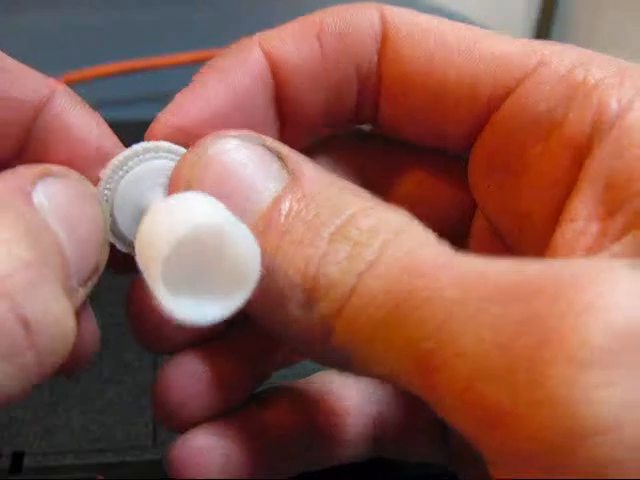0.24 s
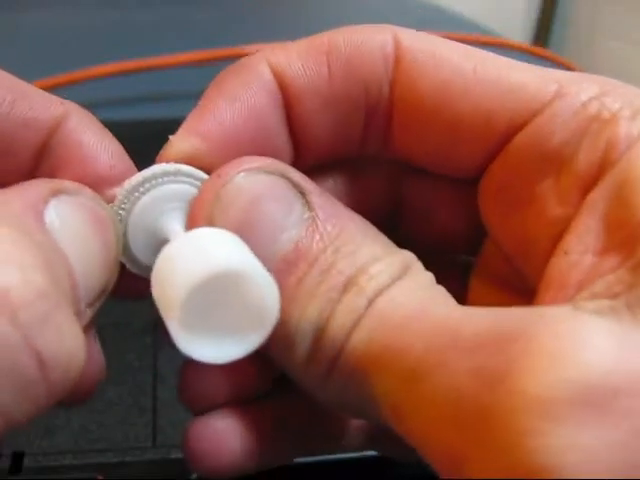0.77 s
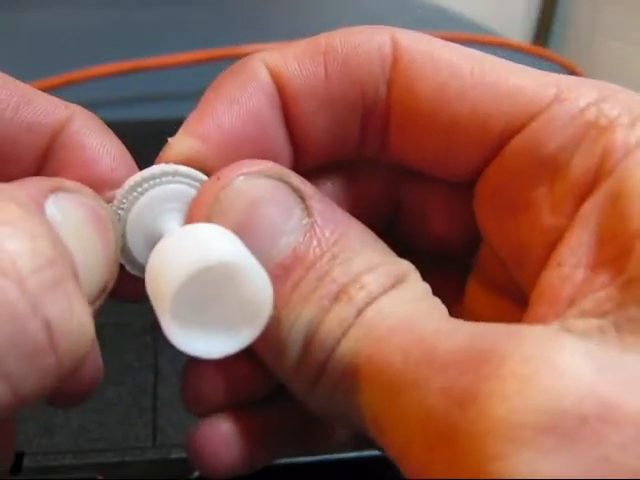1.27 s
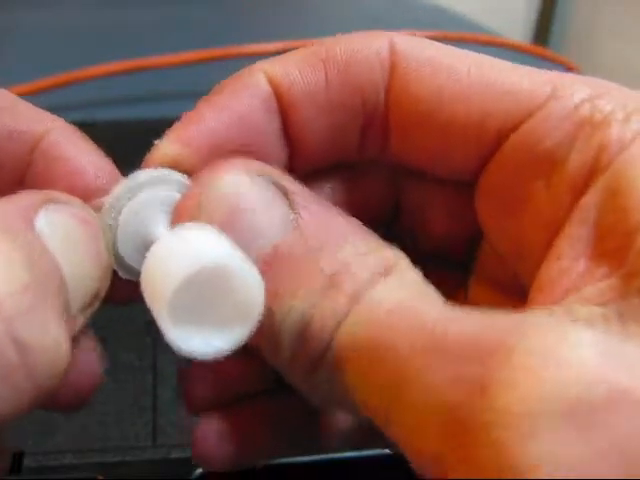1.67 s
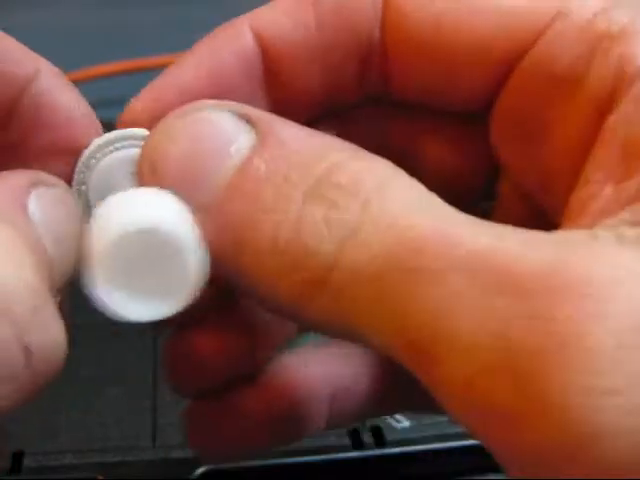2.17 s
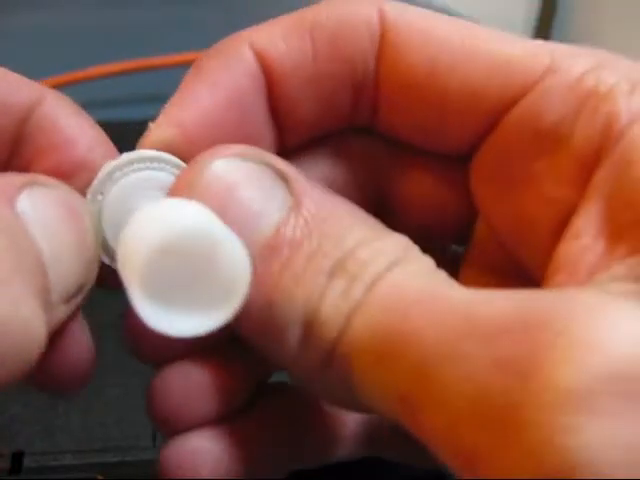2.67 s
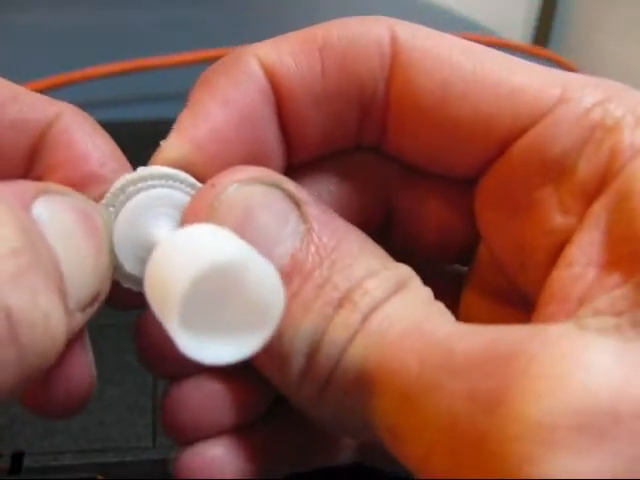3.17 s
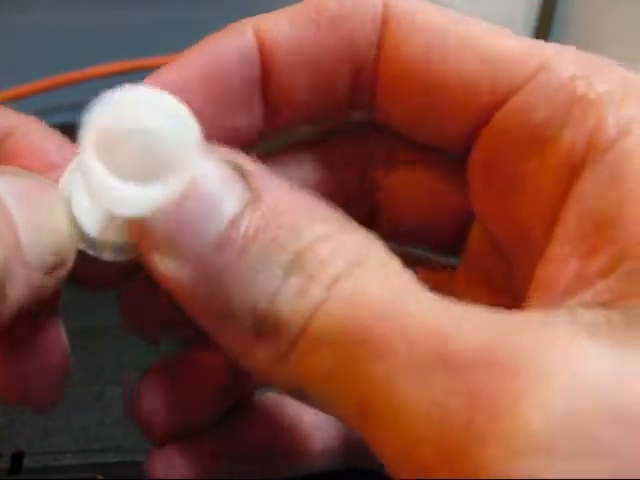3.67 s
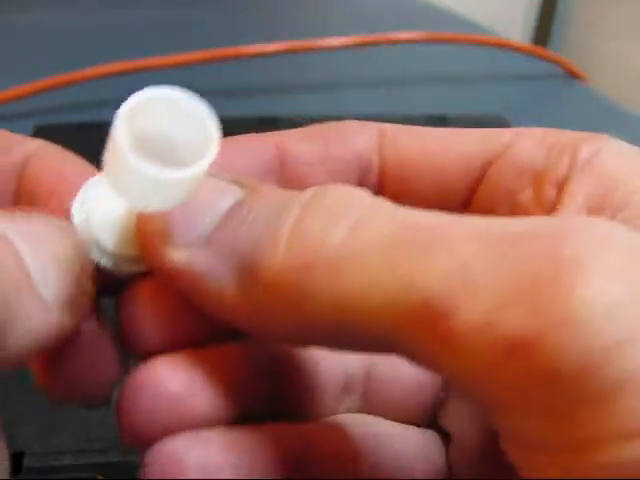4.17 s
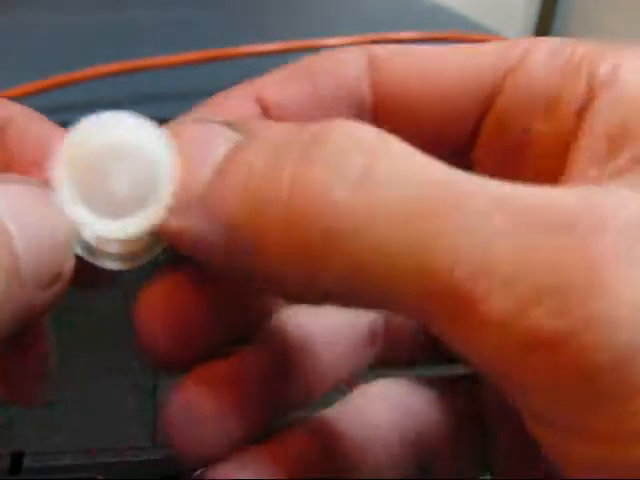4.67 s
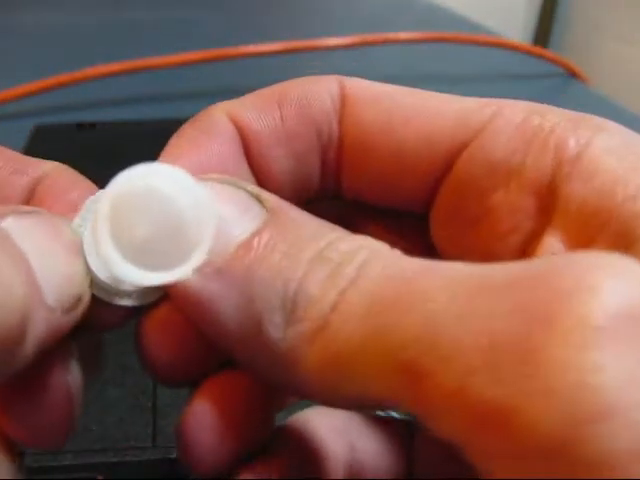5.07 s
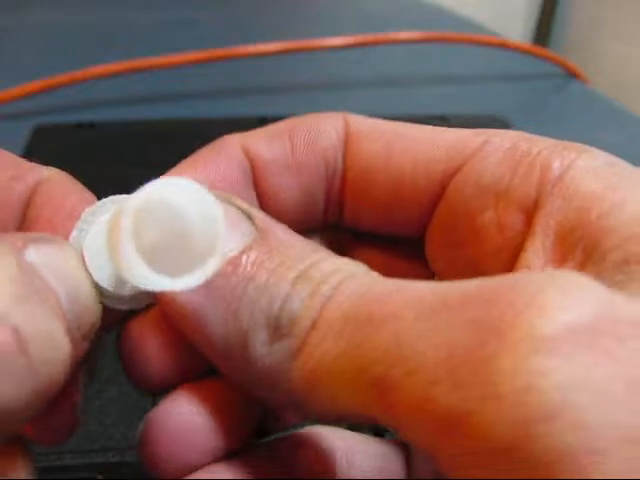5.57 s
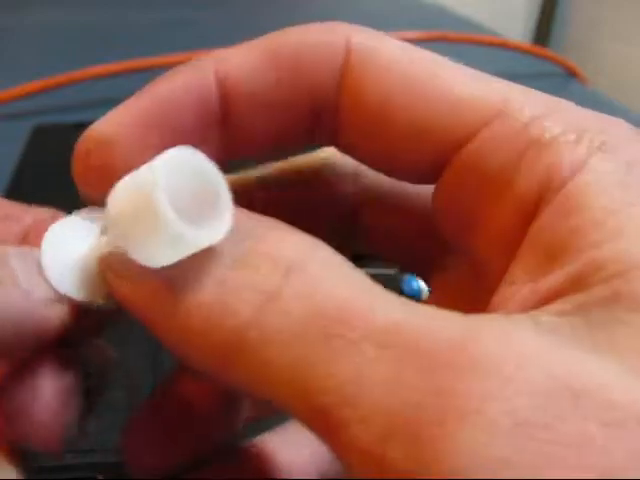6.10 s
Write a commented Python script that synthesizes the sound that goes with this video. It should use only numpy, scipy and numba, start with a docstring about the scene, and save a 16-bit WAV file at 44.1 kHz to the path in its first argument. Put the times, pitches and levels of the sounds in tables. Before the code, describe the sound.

A stereo close-up in a quiet indoor room with a steady low fan hum, soft air and a faint clean tone. A short lens motor whir comes at 0.4 s, then small plastic ticks and a sharp snap at 0.5-0.75, a stronger crack at 1.07 and a lesser one at 1.34. More brief whirs follow near 0.85, 1.4, 1.6 and 2.1-2.3. Faint ticks run from 1.8 to 2.4, then bright snaps at 2.66 and 2.78. The loudest, nearly overloaded double crack hits at 3.2, with small crackles to 3.5. Another snap lands at 4.05 with a duller one at 4.11. Fingertips rub faintly at 4.75-5.1, ending in a tight snapping cluster at 5.08. Small whirs, slight rubbing and faint ticks close by 6.3. Each loud snap has a short, sparse room tail and ducks the background, which slowly recovers.

```python
"""Brittle support material cracks off a small plastic cup under the fingers, close to a camera in a quiet room.
Each snap is a burst of tiny breaks ringing the plastic, answered by sparse room reflections.
Fingertips rub as noise singing with the cup; the lens motor whirs in short bursts of gear noise;
a fan hums as fuzzy tones, a rush of air and one clean tone.
After each loud snap the camera's gain control drops the whole sound and lets it creep back."""
import sys
import numpy as np
from scipy import signal
from scipy.io import wavfile
from scipy.ndimage import uniform_filter1d
from numba import njit

SR = 44100
rng = np.random.default_rng(int(sys.argv[2]) if len(sys.argv) > 2 else 0)


def int16_out(signal):
    """Quantize to a 16-bit WAV file."""
    q = np.round(np.clip(np.atleast_2d(signal).T, -1, 1) * 32767)
    wavfile.write(sys.argv[1], SR, q.astype(np.int16))


N = 279594  # length in samples

# All levels below are those ahead of the microphone and the gain control.
# Cracks: start_s, level_db (rms over 1 ms), crack_ms, left_lag_us (lag of the cup's ring on the left),
# then levels relative to the cup's ring: shards_db, walls_db, base_db
CRACKS = [(0.518, -35.5, 0.33, -3, -1, -15, -25), (.6168, -30, 0.26, -2, -4, -10, -24),
          (0.6603, -11, 0.55, 16, -3, -12.5, -25), (.739, -22.5, 0.41, 0, -1.5, -10.5, -16),
          (1.0706, -2, 0.4, 10, -4.5, -12, -23), (1.2399, -36.5, 0.23, 2, -2, -19.5, -26.5),
          (1.3396, -22, 0.36, 2, -1.5, -10, -27), (1.8054, -28.5, 0.58, 13, -10, -7, -25),
          (1.8494, -43, 0.12, 2, 0, 9, -30), (1.9095, -43, .3, 0, -9.5, -5, -30),
          (1.9408, -47, .15, 2, -4, -3, -30), (2.3293, -50, .3, 3, 3, -8, -37),
          (2.342, -51.5, 0.35, 2, 11.5, -5, -33), (2.4169, -35, 0.2, -2, -11, 0, -29),
          (2.4255, -42, .3, 0, -18, -6, -28), (2.6327, -28.5, 0.16, -0.5, -13, -17, -27),
          (2.6609, -4, 0.19, -0.5, -4.5, -14.5, -31), (2.7849, 0.5, 0.4, 0, -8.5, -14, -30),
          (3.195, 10.5, 0.79, 0.5, -15, -22.5, -18.5), (3.2278, 8.5, 0.39, 0.5, -9.5, -11, -37),
          (3.339, -34.5, .31, 0, 2, -5, -32), (3.3788, -32.5, 0.8, 6, -2, -6, -31),
          (3.4379, -26.5, 0.37, 0, .6, -12.5, -37), (3.5215, -16, 0.57, 8, 4.5, -9, -18),
          (4.0528, -2.5, 0.31, 2, 6.5, -4, -26), (4.1141, -18.5, 1.23, 19, -7, -8, -2.5),
          (5.0756, -22, .4, 38, -13.5, -11.5, -25.5), (5.079, -26, 0.33, 30, -3, -17, -20),
          (5.0807, -1.5, 0.36, 30.5, -12.5, -13, -19.5), (5.0819, -1.5, 0.32, 22, -7, -9, -20),
          (5.0849, -16.5, 11, 18.5, -1, -3.5, -12.5), (6.081, -37.5, 1.9, 0, -4, -15, -41),
          (6.12, -42, 0.56, 3, -4, -15, -20.5), (6.2414, -43, 0.5, 3, 6.5, 7.5, -24),
          (6.282, -42, 0.54, -2, -2.5, 11.5, -24), (6.297, -46, 0.44, 0, -8, 6, -9)]
# Ringing modes of the plastic, one list each for cup, thin shards, walls, base and the thump in the hand:
# pitch_hz (centre of a small random detune), level_db (within the part), t60_s
PLASTIC_MODES = [
    [(5840, 7, 0.0079), (5330, -6, .005), (6500, -13.5, 0.0065)],
    [(9693, 0.5, 0.0045), (10660, 2.5, 0.00407), (11510, 3, .004), (12900, 0, 0.012)],
    [(3070, 4.5, 0.0056), (4390, 5.5, 0.0054), (2550, -3, 0.004)],
    [(1150, 5.5, 0.009), (1780, 3, .006)],
    [(645, 4.5, 0.0068), (300, 0.5, 0.0054)],
]
# How differently the left and right ports hear each part, in the same order: spread_share
PART_SPREAD = [0.074, .1, 0.28, 0.32, .3]
# Stereo lean of the ring, added on the left and taken off on the right: pitch_hz, lean_db
LEFT_LEAN = [(300, 0.75), (1400, -2), (3000, -2.2), (4200, -1), (10000, -0.05)]
THUMP_DB = -28.5  # relative to the ring of the cup
FIRST_BREAK = 3.3  # extra push on the first break
DETUNE = .013  # standard deviation, share of the pitch
# Below BODY_HZ the left ring always lags by BODY_LAG_US; from SHARD_HZ up it has no lag
BODY_HZ, SHARD_HZ, BODY_LAG_US = 3600, 7500, 38
FAR_FADE_DB_PER_S = 8999.5  # extra decay of the ring that feeds the room

# Decay of the room's reflections: pitch_hz, t60_s
ROOM_DECAY = [(500, 0.2), (2600, 0.47), (6000, 0.28), (12000, 0.25)]
ROOM_DB = -19.0

# Fingertips sliding on the cup: start_s, swell_s, hold_s, level_db, pitch_share (of the free ring)
FINGER_RUBS = [(4.74, 0.24, 0.12, -53.5, .97), (6.05, .02, 0.05, -56, 1.09)]
# Smooth spectrum of the skin friction: pitch_hz, density_db (relative, per Hz)
SKIN_HISS = [(1500, -29.5), (3000, -17.5), (6000, -16.5), (9000, -25.5), (12000, -31)]
RUB_SWELL_DB, RUB_STOP_DB_PER_S = 22, 900

# Lens motor bursts: start_s, length_s, level_db (at the start, without the jolt)
MOTOR_BURSTS = [(0.3704, 0.051, -38.5), (0.8455, 0.048, -38.5), (1.4156, 0.05, -37.5),
                (1.5925, .058, -40.5), (2.127, 0.15, -50), (2.2364, 0.081, -47.5), (3.037, .05, -42.5),
                (3.8114, .06, -50.5), (4.6153, 0.05, -40.5), (5.29, .048, -41), (5.5942, .07, -47),
                (5.8608, .039, -44.5), (6.0012, .072, -44)]
# Resonances of the gear noise: pitch_hz, width_hz, level_db (relative, at the peak)
GEAR_TONES = [(1210, 740, -2), (1870, 100, 6), (2924, 300, -4.5), (4020, 150, -3), (5200, 200, -16),
              (5750, 160, -5.5), (6574, 120, -12), (9370, 400, -14), (10200, 650, -11), (10970, 400, -15.5)]
# Smooth spectrum under the gear tones: pitch_hz, density_db (relative, per Hz)
GEAR_FLOOR = [(600, -28), (1500, -7.5), (4500, -10), (7000, -18.5), (11500, -26), (13000, -27.5)]
WHIR_START_S, WHIR_JOLT_DB, WHIR_JOLT_S = .0015, 3.5, 0.0067
WHIR_SAG_DB_PER_S, WHIR_STOP_DB_PER_S = 90.5, 400.

# The fan's fuzzy tones: pitch_hz, width_hz, density_db (relative, per Hz)
FAN_HUM = [(27.9, 5.7, -14), (56.25, 4.5, -8.5), (92, 11, -18), (129.4, 4.7, -6.5), (167.8, 9.9, -2.5),
           (198.6, 8.5, -4), (221.6, 16, 2), (243.8, 18, -2.5), (291.5, 16, -9), (328, 13, -11),
           (494.4, 13, -10.5), (561, 9.2, -14), (866, 4.1, -17)]
# The fan's rush of air: pitch_hz, density_db (relative, per Hz)
FAN_AIR = [(42, -40.5), (65, -22.5), (100, -16), (300, -17.5), (600, -20), (1700, -26), (2330, -33.5),
           (5800, -41), (6900, -47.5), (9600, -52), (12600, -51.5)]
# Likeness of the fan noise left and right: pitch_hz, likeness_share
FAN_LIKENESS = [(60, 1), (270, 1), (580, 0.95), (1240, .83), (2660, 0.72), (4000, .7), (5670, .93),
                (12100, 1)]
FAN_DB = -37.5  # hum and air together, rms
TONE_HZ, TONE_DB = 497, -51.5  # the fan motor's steady tone, peak level

# Response of the microphone port, with a deep dip: pitch_hz, gain_db
MIC_PORT = [(6200, -1), (6900, -4.5), (7400, -9.5), (7650, -27), (8000, -29), (8200, -9), (8700, 0.5)]
MIC_EDGE_HZ, EDGE_HZ = 12720, 16500  # low-pass before the gain control and after the overload

# Gain control
START_DB, LOWEST_DB, MOST_DB = -7.5, -19, 11.0  # opening gain, lowest gain, largest cut at one step
LIMIT_DB, SLOPE = -13.3, 4.  # output limit, dB of cut per dB over it
HOLD_S, RECOVER_PER_S, GLIDE_PER_S = 0.22, 1.42, 79


def snaps():
    """Each crack is a run of tiny breaks that rings the parts of the plastic; returns near and room-feeding sound."""
    near, far = np.zeros((2, N)), np.zeros((2, N))
    t = np.arange(1200) / SR
    break_t = t[:600]
    # differencing leaves little bass: so small a thing moves little of it
    draws = np.diff(rng.standard_normal((len(CRACKS), 2, 601)))
    tunes = rng.standard_normal((len(CRACKS), 4))
    for (start, level_db, crack_ms, lag_us, *parts_db), (main, other), tune in zip(CRACKS, draws, tunes):
        running = np.exp(-(break_t / (max(crack_ms, .05) / 1000)) ** 4)
        main = main + FIRST_BREAK * (break_t == 0)
        snap = np.zeros((2, 2, 1200))  # near and far, left and right
        for modes, part_db, spread in zip(PLASTIC_MODES, [0, *parts_db, THUMP_DB], PART_SPREAD):
            breaks = running * np.array([main + spread * other, main - spread * other])
            hz, mode_db, t60 = np.transpose(modes)[:, :, None, None]

            left_us = np.where(hz < BODY_HZ, BODY_LAG_US, lag_us * (hz < SHARD_HZ))
            lag_s = left_us * np.array([[1e-6], [0]])
            tuned_hz = hz * (1 + DETUNE * tune[:len(modes), None, None])
            ring = amp(-60 * t / t60) * np.sin(2 * np.pi * tuned_hz * (t - lag_s))
            gain = amp(part_db + mode_db + read(LEFT_LEAN, hz) * np.array([[1], [-1]]))

            # off the axis of the cup the ring is shorter, struck by the first four samples only
            ways = [(breaks, 1), (breaks[:, :4], amp(-FAR_FADE_DB_PER_S * t))]
            for way, (blows, fade) in enumerate(ways):
                soft_ring = ring * fade * np.minimum(t / .0002, 1)
                rung = signal.fftconvolve(blows[None], soft_ring, axes=2)[..., :1200]
                loudest = uniform_filter1d(rung ** 2, size=44).max(axis=2, keepdims=True)  # over 1 ms
                snap[way] += (gain * rung / np.sqrt(2 * loudest)).sum(axis=0)
        # near energy, averaged over both sides, as rms over 1 ms
        snap *= amp(level_db) * np.sqrt(2 * SR / 1000 / (snap[0] ** 2).sum())
        add(near, start, snap[0])
        add(far, start, snap[1])
    return near, far


def room(x):
    """Sparse reflections: faint from hands and desk, full from the walls 10 ms on; each band dies at its own speed."""
    taps = np.zeros((2, SR // 2))
    at = np.arange(60, SR // 2 - 20, 20)
    at = at + rng.integers(0, 20, (2, len(at)))
    np.put_along_axis(taps, at, rng.choice([-1., 1.], at.shape), 1)
    taps[1] = 1.6 * taps[0] + 0.27 * taps[1]  # the right is louder and mostly shares the left's reflections

    hz, t, bands = signal.stft(taps, SR, nperseg=128)
    decay = amp(-60 * t / read(ROOM_DECAY, hz)[:, None])
    tail = signal.istft(bands * decay, SR, nperseg=128)[1]

    t = np.arange(tail.shape[1]) / SR
    walls_arrive = 1 + 1.2 * np.exp(-(t - .0102) / 0.0085)
    tail = tail * np.where(t < .0102, amp(-3.5), walls_arrive)
    return signal.fftconvolve(x, tail / np.linalg.norm(tail[0]), axes=1)[:, :N]


def fingertips():
    """Friction noise that swells, holds and stops, singing with the modes of the cup and its walls."""
    t, out = np.arange(N) / SR, np.zeros((2, N))
    for start, swell, hold, db, pitch in FINGER_RUBS:
        # a shorter ring makes a wider resonance
        modes = [(hz * pitch, 2.2 / t60, mode_db) for hz, mode_db, t60 in PLASTIC_MODES[0] + PLASTIC_MODES[2]]
        swell_db = RUB_SWELL_DB * np.clip(1 - (t - start) / swell, 0, 1)
        stop_db = RUB_STOP_DB_PER_S * np.maximum(t - start - swell - hold, 0)
        friction = noise(SKIN_HISS, modes, [(2000, 0.88), (6000, 0.91)], size=256, patchy_db=2.5)
        out += (t > start) * amp(db - swell_db - stop_db) * friction
    return out


def lens_motor():
    """Gear noise in the camera body: starts with a jolt, sags as it runs, dies away."""
    t, level = np.arange(N) / SR, np.zeros(N)
    for start, length, db in MOTOR_BURSTS:
        since = t - start
        onset = np.clip(since / WHIR_START_S, 0, 1)
        jolt_db = WHIR_JOLT_DB * np.exp(-abs(since) / WHIR_JOLT_S)
        run = onset * amp(db - WHIR_SAG_DB_PER_S * since + jolt_db)
        level += run * amp(-WHIR_STOP_DB_PER_S * np.maximum(since - length, 0))
    return level * noise(GEAR_FLOOR, GEAR_TONES, [(500, 0.8), (10000, 1.0)], size=512, patchy_db=2.0)


def fan():
    """Steady hum and rush of air as resonant noise, with one clean motor tone."""
    tone = amp(TONE_DB) * np.sin(2 * np.pi * TONE_HZ * np.arange(N) / SR)
    rush = noise(FAN_AIR, FAN_HUM, FAN_LIKENESS, size=4096, patchy_db=1.58)
    return amp(FAN_DB) * rush + tone


def noise(floor, peaks, same, size, patchy_db):
    """Stereo noise of rms 1: resonances standing on a smooth spectrum, with drifting patches."""
    hz = np.fft.rfftfreq(size, 1 / SR)
    a, b, c, d, patches = rng.standard_normal((4 * N // size + 6, len(hz), 5)).T
    power = amp(2 * read(floor, hz))
    for peak_hz, width, db in peaks:
        power = power + amp(2 * db) / (1 + (2 * (hz - peak_hz) / width) ** 2) ** 2

    patches = uniform_filter1d(patches, size=4, axis=1)  # smooth in time
    patches = evened(uniform_filter1d(patches, size=size // 100, axis=0))  # smooth in pitch

    same = np.clip(read(same, hz), -1, 1)[:, None]
    left = a + 1j * b
    right = same * left + np.sqrt(1 - same ** 2) * (c + 1j * d)
    bands = np.array([left, right]) * np.sqrt(power)[:, None] * amp(patchy_db * patches)
    return evened(signal.istft(bands, nperseg=size, noverlap=3 * size // 4)[1][:, :N])


def amp(db):
    """dB to gain."""
    return 10 ** (np.asarray(db) / 20)


def evened(x):
    """Scales to rms 1."""
    return x / np.sqrt(np.mean(x ** 2) + 1e-20)


def read(points, hz):
    """Table value on a log-frequency axis."""
    f, value = np.transpose(points)
    return np.interp(np.log(hz + 1), np.log(f + 1), value)


def add(mix, start, sound):
    """Adds a stereo sound at start seconds."""
    part = mix[:, round(start * SR):][:, :sound.shape[1]]
    part += sound[:, :part.shape[1]]


def scene():
    """Snaps with their room, over fingertips, lens motor and fan."""
    near, far = snaps()
    return near + amp(ROOM_DB) * room(far) + fingertips() + lens_motor() + fan()


@njit
def gain_control(level_db, start_db, limit_db, slope, most_db, lowest_db, hold, recover, glide):
    """Cuts steeply when its output passes the limit, waits, then creeps back toward full gain."""
    gain_db, target, since_cut = np.zeros(len(level_db)), start_db, hold
    applied = start_db
    for i in range(len(level_db)):
        since_cut += 1
        over_db = level_db[i] + applied - limit_db
        wanted = max(applied - min(slope * over_db, most_db), lowest_db)
        if wanted < target:
            target, since_cut = wanted, 0.
        elif since_cut > hold:
            target -= target * recover
        applied += glide * (target - applied)  # a cut takes some ms to reach the output
        gain_db[i] = applied
    return gain_db


def record(dry):
    """Microphone dip and band limit, gain control, overload at full scale, final band limit."""
    hz = np.linspace(0, SR / 2, 513)
    # minimum phase: rings after a click only; it halves the dB, hence the doubling
    port = signal.minimum_phase(signal.firwin2(1023, hz, amp(2 * read(MIC_PORT, hz)), fs=SR))
    mic_edge = signal.firwin(255, MIC_EDGE_HZ, window=("kaiser", 8), fs=SR)
    heard = signal.oaconvolve(signal.lfilter(port, 1, dry), mic_edge[None], "same", axes=1)

    power = uniform_filter1d((heard ** 2).mean(0), size=176, origin=87)  # over the last 4 ms
    level_db = 10 * np.log10(abs(power) + 1e-12)
    gain_db = gain_control(level_db, START_DB, LIMIT_DB, SLOPE, MOST_DB, LOWEST_DB,
                           HOLD_S * SR, RECOVER_PER_S / SR, GLIDE_PER_S / SR)

    clipped = np.clip(heard * amp(gain_db), -1, 1)
    last_edge = signal.firwin(255, EDGE_HZ, window=("kaiser", 8), fs=SR)
    return signal.oaconvolve(clipped, last_edge[None], "same", axes=1)


dry = scene()
out = record(dry)
int16_out(out)
```